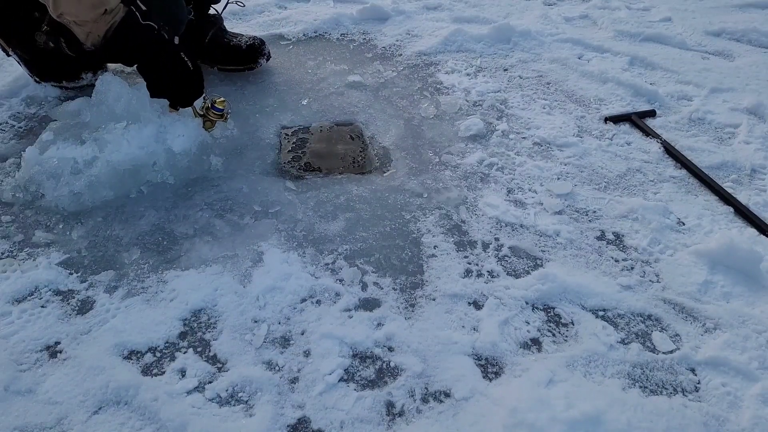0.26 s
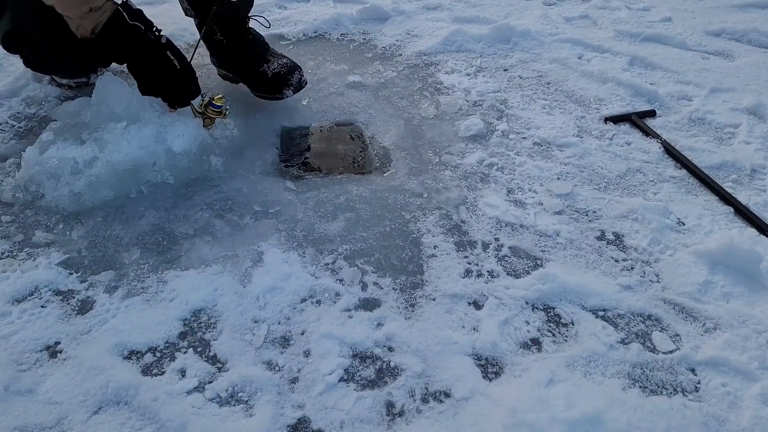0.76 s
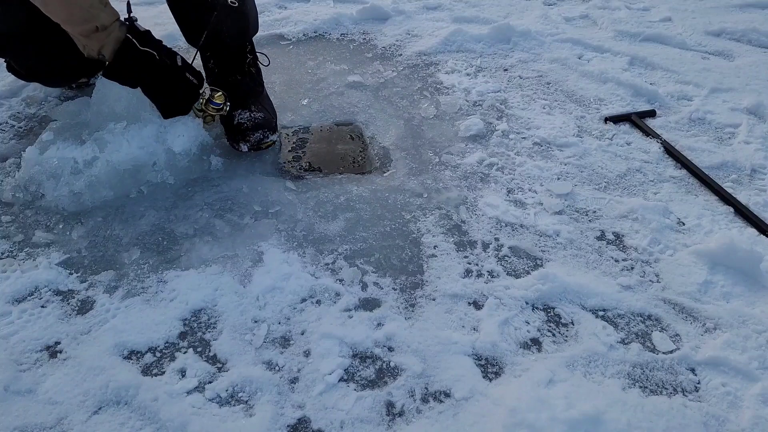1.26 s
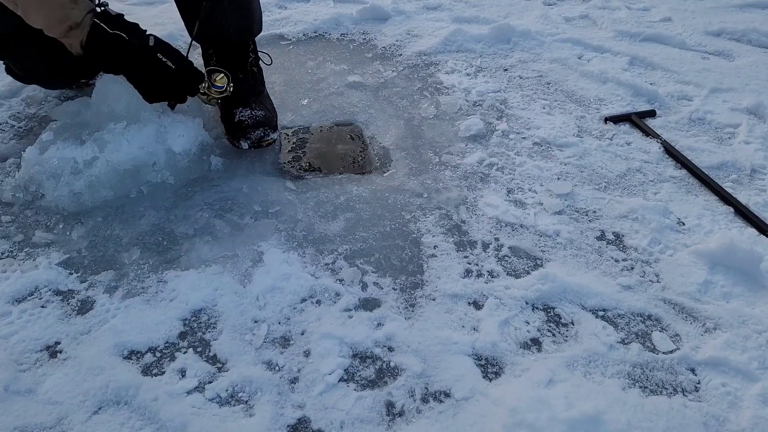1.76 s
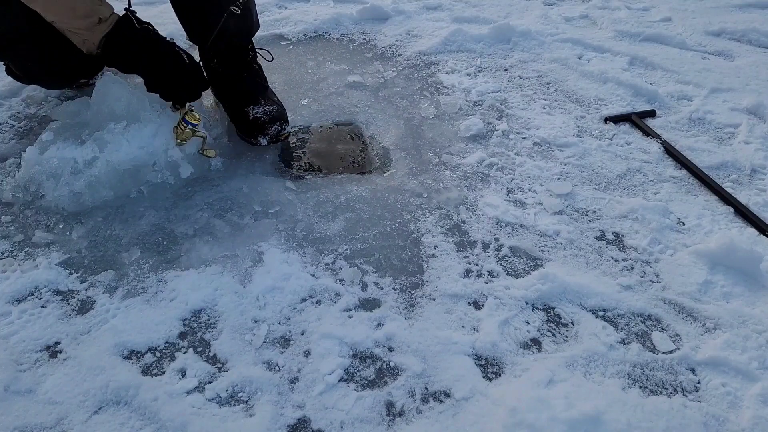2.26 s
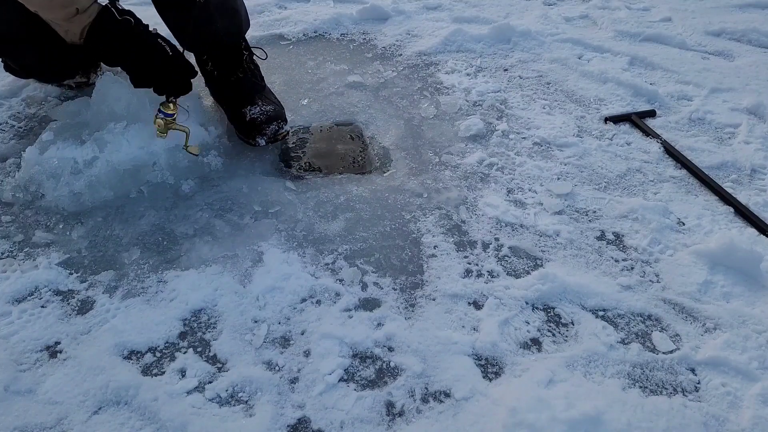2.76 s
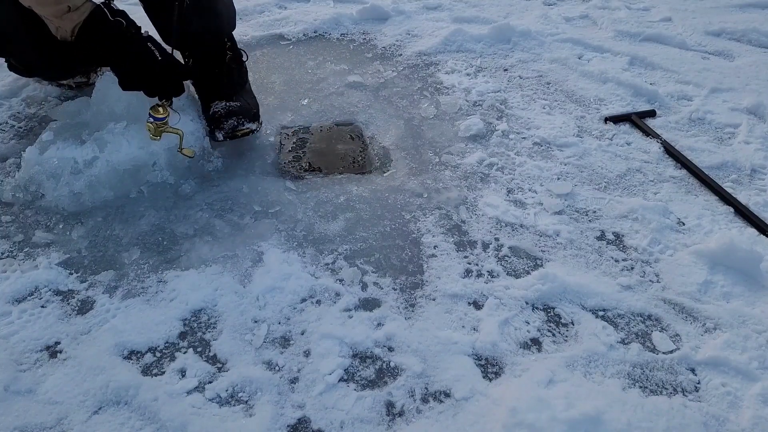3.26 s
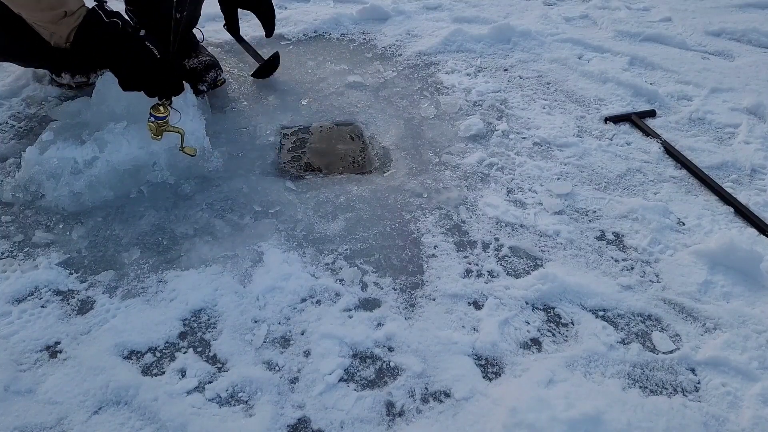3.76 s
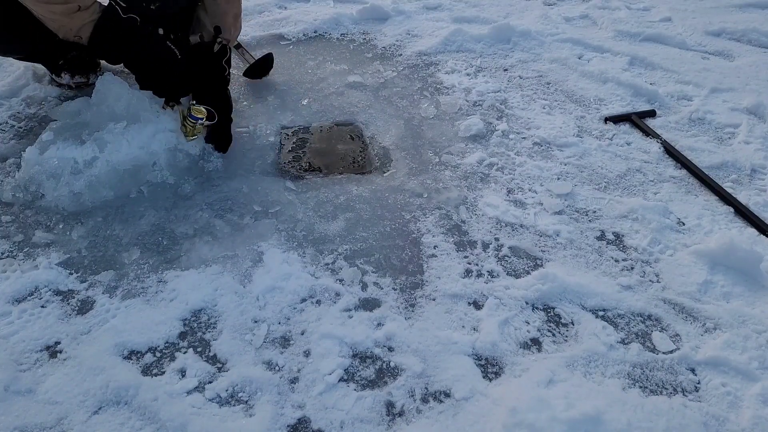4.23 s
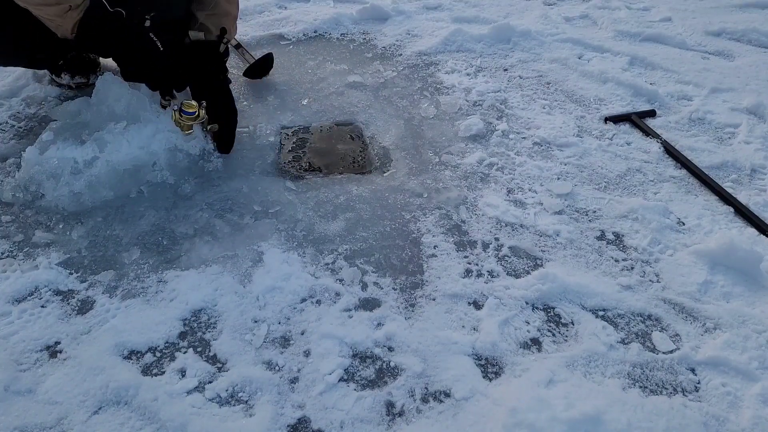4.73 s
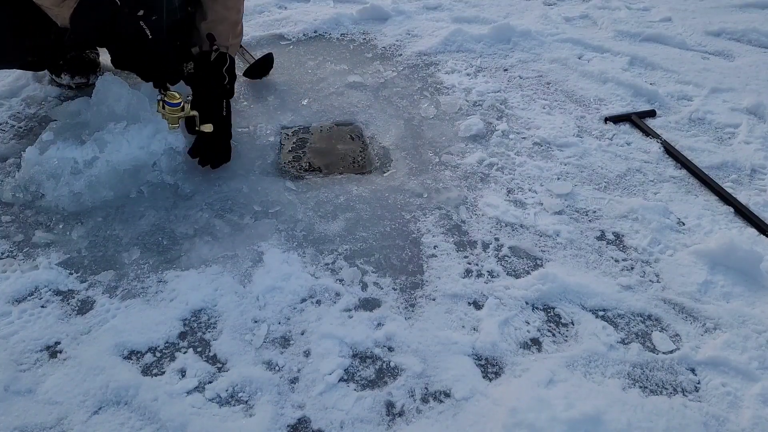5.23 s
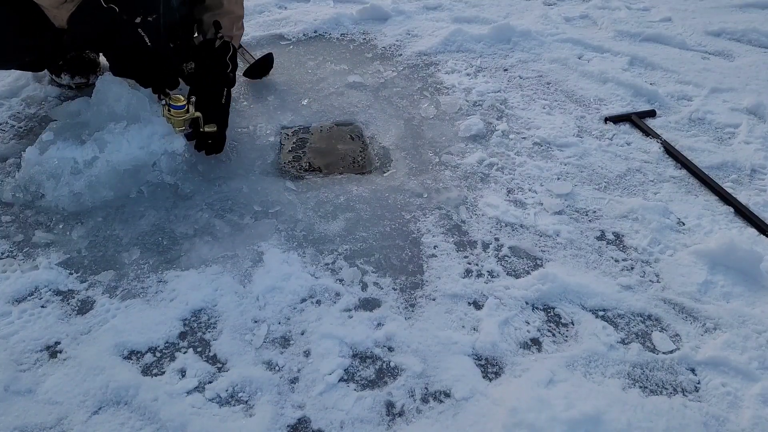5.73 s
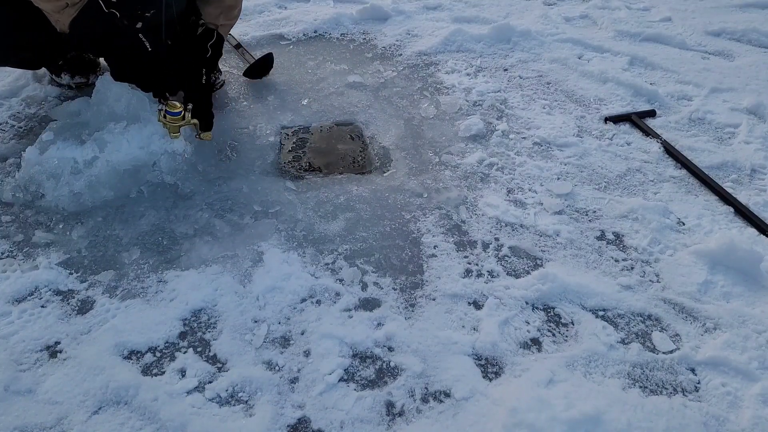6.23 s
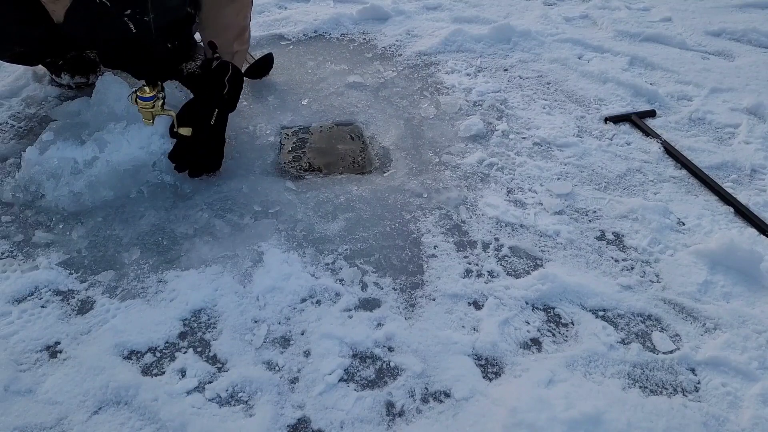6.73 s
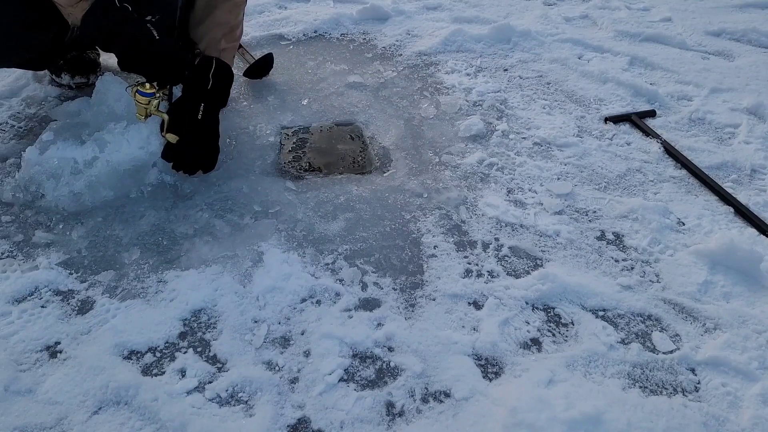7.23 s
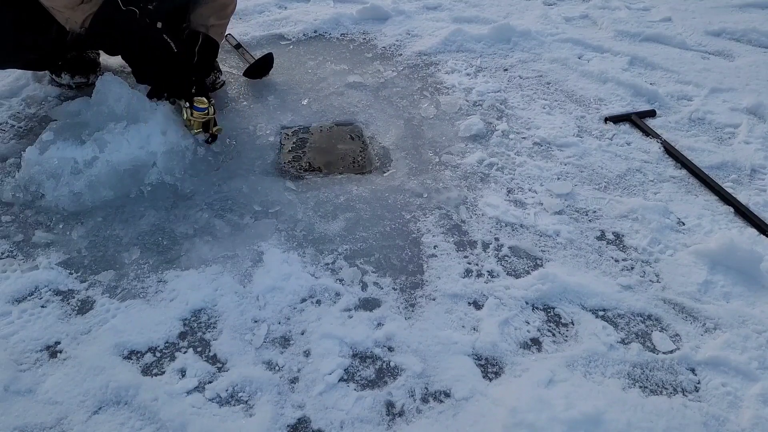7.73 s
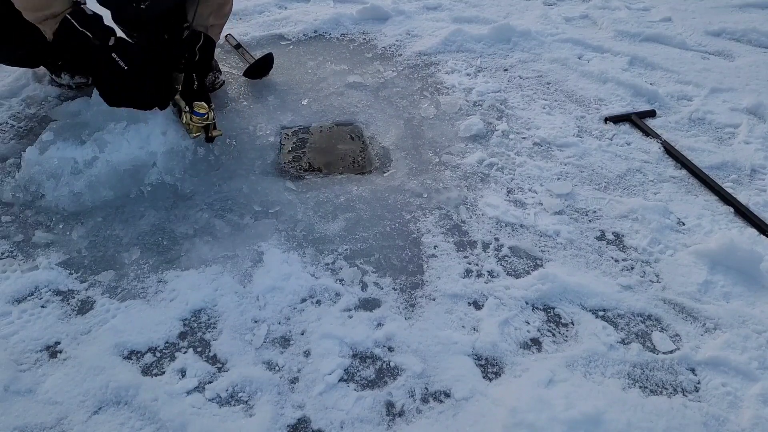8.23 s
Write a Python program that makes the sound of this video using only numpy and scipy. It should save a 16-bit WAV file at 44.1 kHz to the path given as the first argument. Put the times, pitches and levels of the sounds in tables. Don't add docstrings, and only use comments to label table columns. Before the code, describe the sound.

On an open frozen lake, someone crouches left of the microphone. Tiny steel tags on fishing tackle jingle very high and bright at each movement, over crunching boots, gloves dragging slush and dull thuds of ice lumps. Around two seconds a tiny crack pings through the ice; near four a scoop drops with a hollow clack and small bounce. Jingling and crunching continue to the end, dry, over a faint hush.

```python
import sys
import numpy as np
from scipy import signal
from scipy.fft import rfft, irfft, next_fast_len
from scipy.io import wavfile
from scipy.ndimage import uniform_filter1d, map_coordinates

SR = 44100
rng = np.random.default_rng(int(sys.argv[2]) if len(sys.argv) > 2 else 0)


def invert_db(level):
    return 10 ** (np.asarray(level, dtype=float) / 20)


def dump(signal):
    limited = np.clip(np.atleast_2d(signal).T, -1, 1)
    pcm = np.round(limited * 32767).astype(np.int16)
    wavfile.write(sys.argv[1], SR, pcm)


N = 374409


def unit(x):
    return x / np.sqrt(np.mean(x ** 2) + 1e-20)


def along(points, hz):
    f, v = np.transpose(points)
    return np.interp(np.log(hz + 1), np.log(f + 1), v)


def filtered(x, response):
    m = next_fast_len(N + 8192)
    return irfft(rfft(x, m) * response(np.fft.rfftfreq(m, 1 / SR)), m)[..., :N]


def coloured(x, spectrum):
    return unit(filtered(x, lambda hz: invert_db(along(spectrum, hz))))


def add(track, s, sound):
    part = track[max(round(s * SR), 0):][:len(sound)]
    part += sound[:len(part)]


def wobble(rate_hz):
    knots = rng.standard_normal(int(N * rate_hz / SR) + 4)
    return map_coordinates(knots, [np.arange(N) * rate_hz / SR])


def crystals(spectrum, rate_hz, spread_db, hiss):
    size = invert_db(spread_db * np.minimum(rng.exponential(size=N), 3.5))
    breaks = (rng.random(N) < rate_hz / SR) * size * rng.standard_normal(N)
    z = signal.stft(unit(breaks) + hiss * rng.standard_normal(N), nperseg=256)[2]
    patches = uniform_filter1d(rng.standard_normal(z.shape), size=9, axis=0)
    patches = uniform_filter1d(patches, size=7, axis=1)
    raw = signal.istft(z * invert_db(1.8 * unit(patches)), nperseg=256)[1][:N]
    return coloured(raw, spectrum)


ROUND = 1.34
SETTLE_DB, SETTLE_LONGER = -22.5, 2.0


def swells(rows, rise, rest_db):
    s, db, dies = np.transpose(rows)[:, :, None]
    t = np.arange(0, N / SR, .002)
    dies = np.clip(dies, .015, .35)
    away = np.maximum((t - s) / dies, (s - t) / (dies * np.array(rise)[:, None]))
    drop_db = np.maximum(-30 * away ** ROUND, SETTLE_DB - 30 * away / SETTLE_LONGER)
    power = np.sum(invert_db(db + drop_db) ** 2, axis=0) + invert_db(rest_db) ** 2
    return np.interp(np.arange(N) / SR, t, 10 * np.log10(power))


# f/Hz, level/dB per Hz
AIR = [(15, -58), (25, 7.5), (2530, -10), (3810, -13.5), (7510, -17.5), (9080, -23), (14400, -6.5),
       (16500, -16)]
AIR_DB = -87.5


def air():
    return invert_db(AIR_DB) * coloured(rng.standard_normal((2, N)), AIR)


# t/s, level/dB
THUDS = [
    (1.05, -46.5),
    (1.11, -51),
    (1.17, -63.5),
    (3.19, -61),
    (4.14, -73),
    (7.89, -75),
]
# f/Hz, level/dB per Hz
BOOM = [(25, -34), (60, -10), (125, -1), (180, -6), (320, -36)]
THUD_S = .08
STAMP_RISE, DRAG_RISE, SWEEP_RISE = 0.39, 1.47, 0.64


def boom():
    level_db = swells([(*row, THUD_S) for row in THUDS], [STAMP_RISE], -100)
    return invert_db(level_db) * coloured(rng.standard_normal(N), BOOM)


# t/s, level/dB, from f/Hz, to f/Hz, fall/s
PINGS = [
    (2.162, -50, 13500, 8400, .004),
    (2.177, -52, 9000, 1500, .009),
    (2.178, -58, 13000, 9500, .003),
]
PING_T60_S = .06


def sheet():
    out, t = np.zeros(N), np.arange(SR // 60) / SR
    for s, db, high_hz, low_hz, fall_s in PINGS:
        sweep_hz = low_hz + (high_hz - low_hz) * np.exp(-t / fall_s)
        level = invert_db(db - 60 * t / PING_T60_S) * np.minimum(sweep_hz / 4000, 1) ** 2
        add(out, s, level * np.sin(2 * np.pi * np.cumsum(sweep_hz) / SR))
    return out


# t/s, crust level/dB, weight over crust/dB, 30 dB decay/s
STAMPS = [(0.612, -66, 9, .11), (0.773, -67, 15, -0.15), (0.868, -63.5, 8, 0), (0.922, -67, -3, -0.2),
          (1.039, -52, 4, 0.14), (1.142, -59.5, 8.5, 0.1), (2.375, -54, -17, -0.07),
          (3.001, -65.5, -5, 0.3), (3.182, -43.5, 0, 0), (3.202, -59, 2.5, 0.09), (3.76, -55, 9, 0.05),
          (3.957, -61.5, 12, 0.06), (4.598, -78, 9, 0.2), (4.853, -50.5, -4, 0.04),
          (5.462, -54, -3.5, 0.15), (6.292, -47.5, 2.5, 0.0744), (6.596, -63.5, 6, -1)]
# t/s, slush level/dB, weight over slush/dB, 30 dB decay/s
DRAGS = [(0.368, -65.5, -4.5, 0.096), (.71, -64.5, -9, 0.12), (1.117, -46, 3, 0.055),
         (1.335, -74.5, -16, 0.068), (1.6, -76.5, -23, 0.1), (1.92, -65.5, -31, 0.11),
         (2.431, -63.5, -9, 0.16), (3.58, -77.5, -4, 0.18), (4.462, -61, 0.5, 0.11),
         (5.08, -64.5, -23, 0.061), (5.198, -48, -7, 0.082), (5.756, -49.5, -7.5, 0.049),
         (6.048, -49.5, -3.5, 0.085), (6.721, -68, -18, 0.18), (6.907, -60.5, -6.5, 0.097),
         (7.13, -52.5, -2, 0.057), (7.364, -60.5, -12.5, 0.055), (7.612, -60.5, -2.5, 0.032),
         (7.901, -51, 0.5, 0.083), (8.166, -55.5, -3.5, 0.055), (8.386, -67, -14, 0.093)]
# t/s, level/dB, 30 dB decay/s
SWEEPS = [(0.049, -87, 4), (.509, -64, 0), (0.77, -55, 0), (1.33, -58, 0), (1.58, -65, -0.4),
          (1.94, -63.5, 0.17), (2.162, -83, -0.3), (2.527, -52, 0), (2.863, -66, 0.3), (3.155, -42.5, 0.06),
          (3.6, -70, 0.2), (4.454, -56.5, 0.08), (5.749, -49.5, .06), (5.927, -50, -0.03),
          (6.175, -61, 0.1506), (7.258, -58.5, -2), (8.384, -58, -0.82)]
# weight, crust and slush, frost level/dB
REST_DB = [-97.5, -96.5, -83.5]
FROST_DB, FROST_LEAD_S, WEIGHT_LAG_S = -0.5, 0.0028, 0.0014


def moves():
    s, db, heavy_db, dies = np.transpose(STAMPS + DRAGS)
    k = len(STAMPS)
    rise = [STAMP_RISE] * k + [DRAG_RISE] * len(DRAGS)
    weight = list(zip(s + WEIGHT_LAG_S, db + heavy_db, dies))
    press = list(zip(s, db, dies))
    frost = list(zip(s - FROST_LEAD_S, db + FROST_DB, dies)) + SWEEPS
    return (swells(weight, rise, REST_DB[0]),
            swells(press[:k], rise[:k], REST_DB[1]),
            swells(press[k:], rise[k:], REST_DB[1]),
            swells(frost, rise + [SWEEP_RISE] * len(SWEEPS), REST_DB[2]))


# from t/s, to t/s, frost/dB, slush/dB, weight over slush/dB
SLIDES = [(0.107, 0.3, -99, -82, -6), (0.528, 0.614, -91, -82, 9), (0.652, 0.877, -74, -66.5, -6.5),
          (1.168, 1.232, -69, -72, 2), (1.39, 1.443, -88, -95, -10), (1.499, 1.6, -70, -83.5, -7),
          (1.706, 1.754, -76, -77.5, -6), (2.156, 2.33, -76, -85, 5), (2.337, 2.392, -48, -83, -14),
          (2.374, 2.478, -84, -64, -5), (2.6, 2.724, -75, -98, 0), (2.952, 3.07, -64, -72.5, -9),
          (3.28, 3.36, -77, -99, -6), (3.4, 3.465, -74, -95, 6), (3.997, 4.005, -53.5, -58, 3),
          (4.014, 4.105, -64.5, -68, -8), (4.116, 4.205, -69, -80.5, 8), (4.216, 4.293, -64.5, -89.5, 14),
          (4.302, 4.348, -60, -77.5, 10), (4.352, 4.412, -70, -69, -4), (4.56, 4.604, -72, -75.5, 1),
          (4.807, 4.941, -70.5, -70.5, -1), (4.953, 5.06, -75.5, -75, -4), (5.373, 5.44, -67.5, -72, -9),
          (5.5, 5.56, -89, -91, -10), (6.138, 6.216, -71.5, -68.5, -10), (6.46, 6.531, -73.5, -86, -6),
          (6.549, 6.798, -72.5, -68, -4), (5.901, 5.957, -60.5, -67, -13), (0, 0.083, -87, -99, -11),
          (6.8, 6.892, -66, -69, -7), (7.02, 7.06, -87, -79, 0), (7.183, 7.34, -72, -74, -1.5),
          (7.452, 7.514, -68, -72.5, -3), (7.517, 7.624, -59.5, -62.5, -14), (7.64, 7.736, -83, -89, 7),
          (7.765, 7.85, -69, -71.5, 0), (8.015, 8.117, -71.5, -71.5, -10), (8.215, 8.273, -89, -83, -15)]
# from t/s, to t/s, frost/dB, slush/dB, weight over slush/dB
SHUFFLES = [(1.825, 1.875, -66, -95, -10), (1.977, 2.13, -78.5, -97, -2), (2.488, 2.586, -61, -77.5, -15),
            (3.13, 3.174, -45, -46, -0.5), (3.8, 3.919, -100, -80, 7.5), (4.436, 4.482, -59.5, -57, -9),
            (5.61, 5.685, -73, -75.5, -8), (5.79, 5.9, -78.5, -75.5, -7), (6.258, 6.354, -66, -63.5, -1.5),
            (0.875, 0.95, -82, -89, 10), (2.6, 2.66, -71, -88, -10)]
SLIDE_EDGE_S = 0.014


def slides(level_db, under_db):
    start, end = np.transpose(SLIDES + SHUFFLES)[:2, :, None]
    t = np.arange(0, N / SR, .002)
    outside = np.maximum(np.maximum(start - t, t - end), 0) / SLIDE_EDGE_S
    power = np.sum(invert_db(level_db[:, None] - 30 * outside) ** 2, axis=0)
    return 10 * np.log10(np.interp(np.arange(N) / SR, t, power) + invert_db(under_db) ** 2)


# f/Hz, level/dB per Hz
WEIGHT = [(20, -47), (45, -27), (100, -13.5), (160, -15), (250, -0.5), (470, -4), (900, -12), (1300, -32)]
CRUNCH = [(250, -21.5), (500, -6.5), (900, -8.5), (1800, -6), (2800, -9), (4500, -8), (7000, -47)]
SLUSH = [(250, -26.5), (500, -6), (1100, -5.5), (1800, -5.5), (2800, -10), (4500, -5.5), (7000, -41.5)]
FROST = [(2500, -18), (4500, -3.5), (7000, -3.5), (9000, -6.5), (11500, 0), (14500, 3), (15800, 3.5),
         (16600, -45)]


def snow():
    weight_db, crunch_db, slush_db, frost_db = moves()
    frost, wet, heavy = np.transpose(SLIDES + SHUFFLES)[2:]
    weight_db = slides(wet + heavy, weight_db)
    slush_db = slides(wet, slush_db)
    frost_db = slides(frost, frost_db)
    clumps_db = 1.5 * wobble(70)
    weight = invert_db(weight_db - 5.5) * crystals(WEIGHT, 250, 2.1, hiss=0.87)
    crunch = invert_db(crunch_db + 0.8 + 2.6 * clumps_db) * crystals(CRUNCH, 800, 2.7, hiss=0.88)
    slush = invert_db(slush_db - 2 + 1.8789 * clumps_db) * crystals(SLUSH, 700, 2.4, hiss=1.3)
    hissing = invert_db(frost_db + 6 + clumps_db) * crystals(FROST, 4000, 1.8, hiss=1.3)
    return weight + crunch + slush + hissing


# t/s, level/dB, f/Hz
LUMPS = [(0.322, -53.5, 580), (0.771, -53.5, 440), (0.8676, -43.5, 412), (1.027, -48, 139),
         (1.1415, -35, 475), (1.151, -52, 392), (1.054, -45, 364), (3.131, -53, 362), (3.157, -46, 393),
         (3.218, -52, 480), (3.781, -48, 1060), (3.879, -69, 400), (4.445, -53, 369), (5.463, -51, 453),
         (5.735, -53, 410), (6.285, -49, 650), (7.336, -55, 714), (7.598, -54, 495), (7.925, -52, 270),
         (8.157, -50.5, 534), (2.364, -58, 575), (2.394, -47, 527), (3.755, -40.5, 223), (3.77, -64, 707),
         (4.77, -72, 5440), (7.035, -59, 525), (7.61, -50.5, 720), (4.302, -59.5, 380), (4.838, -49.5, 654),
         (6.017, -46.5, 258), (6.296, -41.5, 313), (7.228, -57, 250), (7.879, -53, 275.2)]


def lumps():
    out, t = np.zeros(N), np.arange(SR // 8) / SR
    for s, db, hz in LUMPS:
        level = invert_db(db + 6.5 - 60 * t * (hz / 400) ** 0.34 / 0.023)
        add(out, s, level * np.sin(2 * np.pi * hz * t) * (1 - np.exp(-t / 0.0018)))
    return out


# t/s, level/dB, centre f/Hz
CHIPS = [(0.9467, -45, 11500), (1.072, -33.5, 1750), (1.108, -35.5, 2200), (1.117, -31, 1520),
         (1.1205, -34, 3600), (1.056, -34, 1950), (1.169, -50, 1600), (3.885, -66, 1450),
         (4.033, -39, 2940), (4.051, -51, 1500), (1.3025, -46, 8800), (2.9952, -38, 6260),
         (3.001, -38, 8960), (3.445, -46.5, 1930), (3.4535, -42, 2320), (3.7539, -33.5, 5700),
         (3.804, -38, 8200), (3.9274, -18.5, 11100), (3.9282, -27, 9900), (4.001, -37, 1320),
         (4.72, -58, 5950), (5.569, -51, 11370), (8.438, -59, 8000), (1.004, -47, 7000),
         (1.2945, -54, 12000), (1.44, -62, 9100), (2.1528, -39.5, 10400), (2.4538, -52, 12000),
         (2.48, -56, 6000), (2.6715, -50, 12100), (3.443, -45.5, 12000), (3.524, -56, 5930),
         (3.9607, -41.5, 9000), (4.735, -65, 12000), (4.866, -45.5, 5500), (4.918, -60, 6000),
         (4.96, -53.5, 2500), (5.003, -59, 12000), (5.032, -64, 14000), (5.575, -48, 9000),
         (5.887, -50.5, 6800), (6.21, -59, 2000), (6.788, -54, 6000), (7.1791, -53, 8000),
         (7.7139, -61, 13000), (7.794, -47.5, 6000), (8.108, -46, 13000), (8.231, -56, 3000),
         (8.304, -73, 6000), (8.3524, -55, 12000)]
# t/s, level/dB
TICKS = [(1.351, -50.5), (1.403, -67), (1.502, -53), (1.5956, -45), (1.6154, -59), (4.2726, -47.5),
         (4.7413, -65), (4.847, -45), (5.7235, -48), (5.917, -44), (6.2716, -46), (8.3778, -49.5)]
TICK_HZ, TICK_DB = 7000, 5.5


def chips():
    out, t = np.zeros(N), np.arange(SR // 8) / SR
    for s, db, hz in CHIPS + [(s, db + TICK_DB, TICK_HZ) for s, db in TICKS]:
        b, a = signal.butter(3, np.clip([.55 * hz, 1.8 * hz], 100, 20000), "bandpass", fs=SR)
        noise = rng.standard_normal(len(t))
        burst = signal.lfilter(b, a, invert_db(db - 4.5 - 60 * t / 0.018) * noise)
        add(out, s, burst / np.std(signal.lfilter(b, a, noise)))
    return out


# t/s, f/Hz, level/dB
CREAK = [(7.685, 1010, -90), (7.693, 1020, -57), (7.715, 1025, -60), (7.745, 1060, -68), (7.765, 1150, -63),
         (7.82, 1090, -66), (7.96, 1080, -71), (8.0, 1080, -90)]


def creak():
    s, hz, db = np.transpose(CREAK)
    now = np.arange(N) / SR
    uneven = now > 7.72
    slip = np.cumsum(np.interp(now, s, hz) * (1 + .05 * wobble(200) * uneven)) / SR
    level_db = np.interp(now, s, db, -200, -200) + 4 * wobble(70) * uneven - 5
    return invert_db(level_db) * np.sin(2 * np.pi * slip)


# t/s, level/dB, dulling/dB per octave
DROPS = [
    (3.927, -29.5, -1),
    (4.001, -46, 6),
]
# f/Hz, level/dB, t60/s
SCOOP = [(231, -13, .16), (430, -8, .08), (500, -9, .13), (770, -10, .1), (960, -12, .04), (1140, -1, .05),
         (1490, -9, .08), (1790, -6, .04), (1895, 1, .055), (2800, -12, .02), (3500, -14, .025)]


def scoop():
    out, t = np.zeros(N), np.arange(SR // 8) / SR
    for s, db, dull_db in DROPS:
        knock = np.zeros(len(t))
        for hz, mode_db, t60 in SCOOP:
            level_db = mode_db - dull_db * np.log2(hz / 500) - 60 * t / t60
            knock += invert_db(level_db + 1.1 * wobble(150)[:len(t)]) * np.sin(2 * np.pi * hz * t)
        add(out, s, invert_db(db - 3.5) * knock * (1 - np.exp(-t / 0.0012)))
    return out


# t/s, small tag/dB, large tag/dB, clasp/dB, t60/s
STRIKES = [(.2103, -31.5, -38.5, -58, 0.11), (.4827, -36.5, -43, -50.5, 0.35),
           (.6035, -32.5, -36.5, -53.5, 0.13407), (1.0172, -27, -34, -52.5, 0.081),
           (1.2048, -24.5, -34, -52.5, 0.059), (1.6991, -34, -42, -74, 0.13),
           (1.7978, -36, -36.5, -51.5, 0.088), (1.8707, -34, -35, -51.5, 0.11),
           (1.9224, -23.5, -29, -44, 0.073), (2.2128, -29.5, -38, -55, 0.1),
           (2.2498, -33, -37, -39.5, 0.14), (2.3056, -32.5, -36.5, -44.5, 0.069),
           (2.7701, -23.5, -31.5, -45.5, 0.084), (2.929, -32.5, -36.5, -42.5, 0.26),
           (3.0308, -34, -53, -49.5, 0.097),
           (3.562, -39, -42, -49, 0.0622), (4.0071, -30, -35.5, -42, 0.04815),
          (4.4842, -29, -29.5, -42, 0.25), (5.061, -25, -30.5, -38, 0.1), (5.61, -35, -37.5, -49, 0.093),
          (6.022, -35, -37, -52, 0.063), (6.2986, -25.5, -27, -46, 0.11), (6.651, -28, -33, -45.5, 0.068),
          (6.8874, -24.5, -28.5, -36.5, 0.077), (7.0668, -42, -33.5, -38.5, 0.11),
          (7.3521, -24, -30.5, -47, 0.098), (7.8976, -26.5, -44, -39.5, 0.056),
          (8.1465, -27, -32, -39, 0.056), (8.462, -32.5, -41.5, -51.5, 0.05983)]
# t/s, small tag/dB, large tag/dB, t60/s
REBOUNDS = [(0.2706, -34, -38.5, 0.025), (.345, -33, -38.5, 0.1), (.408, -36, -35.5, 0.045),
            (0.5016, -34, -39.5, 0.09), (0.527, -45, -57, 0.15), (0.772, -45.5, -61, 0.1161),
            (0.847, -47.5, -60.5, 0.22), (1.0578, -38, -40.5, 0.081), (1.5383, -48, -49.5, 0.15),
            (1.72, -34, -47, 0.14), (2.2407, -63, -78, 0.09), (2.88, -58, -73, 0.11),
            (2.62, -57, -63, 0.22), (3.095, -60, -80, 0.1), (4.535, -48, -75, 0.17),
            (4.4917, -23, -41.5, 0.17), (2.5973, -30.5, -43, 0.061), (2.8383, -28, -44.5, 0.035),
            (2.8587, -42, -36, 0.071), (3.0605, -36, -54, 0.06274), (3.581, -50, -51, 0.17),
            (4.0288, -36, -52, 0.21), (4.0486, -45, -37, 0.063), (4.5072, -46, -37.5, 0.11),
            (5.0875, -30, -37.5, 0.045), (6.0397, -45, -41.5, 0.13), (6.3236, -40, -36.5, 0.082),
            (6.6703, -43, -49.5, 0.26), (6.6891, -44, -46.5, 0.067), (7.366, -24, -38.5, 0.059),
            (7.9034, -30.5, -34, 0.073)]
# t/s, small tag/dB, large tag/dB
TOUCHES = [(0.001, -55, -62.5), (0.044, -64, -62), (0.108, -54, -54), (0.1176, -43, -41), (0.336, -61, -43),
           (0.3974, -50, -39), (0.6682, -42, -43.5), (0.746, -47, -47), (0.916, -58, -64),
           (1.3226, -64, -49), (1.4642, -52, -54.5), (2.538, -43, -47.5), (2.5906, -46, -45.5),
           (2.7271, -37, -42), (2.8271, -48, -61), (4.087, -67, -55.5), (5.31, -49, -48),
           (6.005, -43, -40.5), (6.0714, -73, -50), (6.3727, -53.5, -61), (7.441, -54, -44),
           (0.359, -32, -46.5), (.367, -35, -51), (0.419, -51, -50.5), (1.257, -73, -64.5),
           (7.957, -56, -61), (8.007, -70, -78), (8.21, -63, -59), (2.112, -70, -75), (2.135, -71, -70),
           (8.28, -74, -72)]
TOUCH_T60_S = 0.085
CLASP_DB = -12.5


def contacts():
    lighter = REBOUNDS + [(*row, TOUCH_T60_S) for row in TOUCHES]
    lighter = [(s, small, large, large + CLASP_DB, t60) for s, small, large, t60 in lighter]
    return sorted(STRIKES + lighter)


# f/Hz, level/dB, share of contact t60
TAGS = [
    [(14078, 0, 0.75), (14125, -14, .6), (14370, -21, 0.35), (14945, -16, .6), (13545, -21, 0.3)],
    [(11820, -6, 0.36), (12078, -9, 0.4), (11400, -4.5, 0.12), (11180, -12, .2)],
    [(7640, -4.5, 0.27), (8690, -1.5, 0.19), (9760, -8, 0.19), (6870, -14, .2)],
    [(5432, -1, 0.48), (6240, -10, 0.14), (4440, -14.5, 0.14), (5150, -14, .3)],
]
TURN_DB = 5
LINGER_DB, LINGER_S, HELD_DB = -27, .4, -10


def tag_ring(t, groups_db, t60, turned, choke):
    free_db = LINGER_DB + HELD_DB * turned + 45 * np.log10(np.clip(t60 / .1, .3, 1.3))
    ring = invert_db(groups_db[1] + 2.0 - 60 * t / 0.0024) * np.diff(rng.standard_normal(len(t) + 2), 2) / 2
    for modes, group_db in zip(TAGS, groups_db):
        hz, level_db, share = np.transpose(modes)[:, :, None]
        large = (hz > 6000) & (hz < 13000)
        share = share * np.where(large, min(1, (.1 / t60) ** .6), 1)
        level_db = level_db + TURN_DB * turned * (hz > 14600)
        detune, loudness, phase, graze = rng.standard_normal((4, len(modes), 1))
        fade = choke * invert_db(-60 * (t / (t60 * share)) ** 1.45) + invert_db(free_db - 60 * t / (LINGER_S * share))
        graze_hz = 70 * np.exp(0.46 * graze)
        touch_db = np.clip(-level_db, 1.2, 4) * np.sin(2 * np.pi * graze_hz * t + 3 * phase)
        mode_hz = hz * (1 + np.where(hz < 13000, .003, 0.00041) * detune)
        tone = np.sin(2 * np.pi * mode_hz * t + 3 * phase)
        mode_db = group_db + level_db + 4.4 * loudness * (level_db < -1)
        ring = ring + np.sum(invert_db(mode_db) * fade * invert_db(touch_db) * tone, axis=0)
    return invert_db(2.5) * ring * (1 - np.exp(-t / 0.00037))


# f/Hz, level/dB per Hz
RATTLE = [(1500, -28), (3500, -8), (6000, -8), (9000, -5), (12000, -3), (15000, 1.5), (16500, -20)]
TURN_S = 3.4
DEEPER_DB = -5
SPOT_DB = 2


def jingle():
    out, shaking, t = np.zeros(N), np.zeros(N), np.arange(SR // 7) / SR
    taps = contacts()
    next_s = [tap[0] for tap in taps[1:]] + [N / SR + 1]
    for (s, small_db, large_db, clasp_db, t60), following in zip(taps, next_s):
        deeper_db = large_db + DEEPER_DB + SPOT_DB * rng.standard_normal()
        groups_db = [small_db, large_db, deeper_db, clasp_db]
        choke = np.exp(-np.maximum(t - (following - s), 0) / 0.0022)
        add(out, s, tag_ring(t, groups_db, np.clip(t60, .02, .3), s > TURN_S, choke))
        add(shaking, s, choke * invert_db(max(groups_db[1:3]) - 7.5 - 60 * (t / 0.079) ** 1.09))
    return out + shaking * crystals(RATTLE, 1600, 1.8, hiss=1.1)


# f/Hz, left re right level/dB
NEARER = [(60, -1), (400, 0.5), (1400, 4), (2800, 8.5), (5500, 10), (10000, 15), (14000, 25)]
LAG_S = 0.00015


def scene():
    near = boom() + sheet() + snow() + lumps() + chips() + creak() + scoop() + jingle()
    hz, _, z = signal.stft(near, SR, nperseg=256)
    scattered = z * np.exp(2j * np.pi * rng.random(z.shape)) * ((hz + 60) / (hz + 2200))[:, None]
    stray = signal.istft(scattered, SR, nperseg=256)[1][:N]
    shade = lambda hz: invert_db(-along(NEARER, hz)) * np.exp(-2j * np.pi * hz * LAG_S)
    right = filtered(near + invert_db(7.5) * stray, shade)
    return np.array([near, right]) + air()


def low_pass(x):
    return signal.sosfilt(signal.butter(12, 16800, fs=SR, output="sos"), x)


def record(dry):
    band = lambda hz: hz ** 2 / (hz ** 2 + 30 ** 2) / (1 + (hz / 16000) ** 70)
    return low_pass(filtered(dry, band))


dry = scene()
out = record(dry)
dump(out)
```